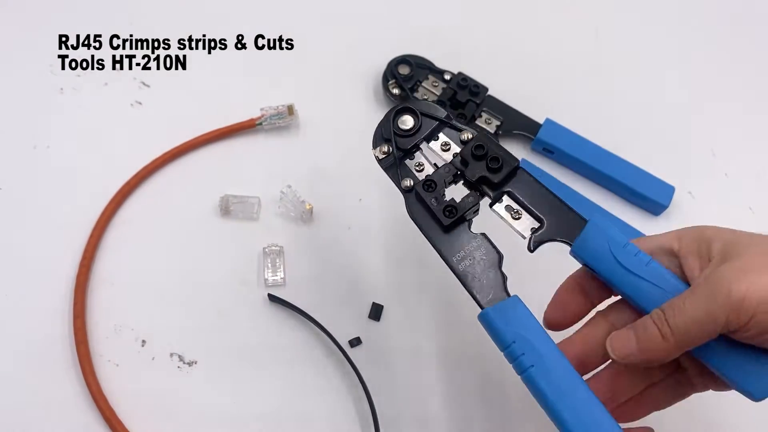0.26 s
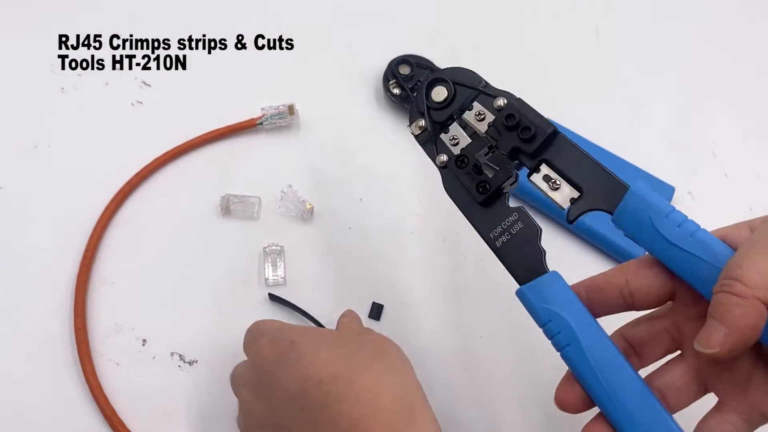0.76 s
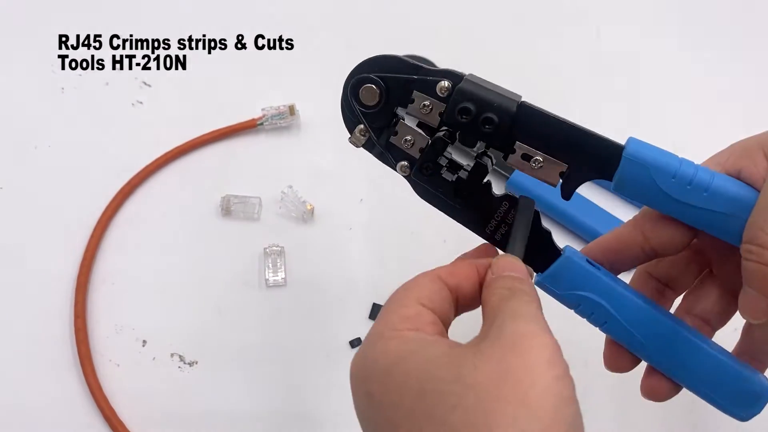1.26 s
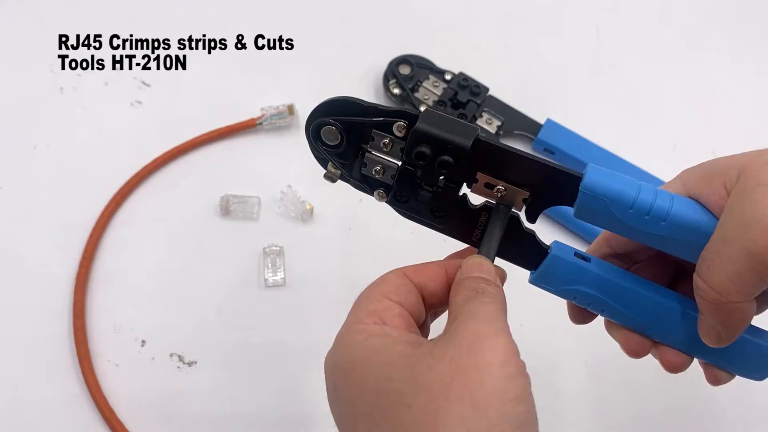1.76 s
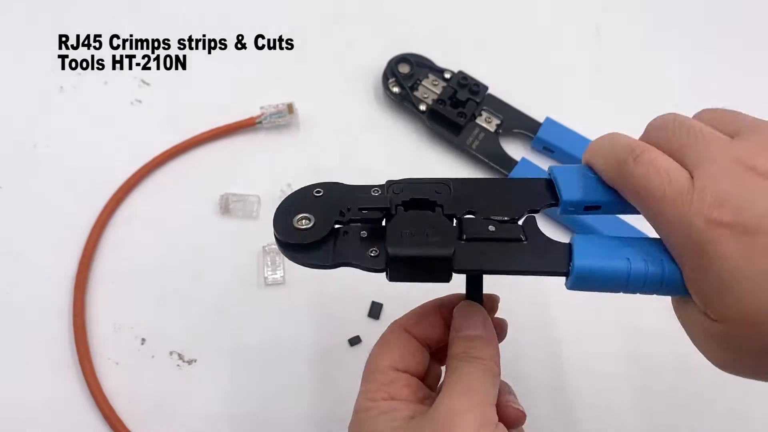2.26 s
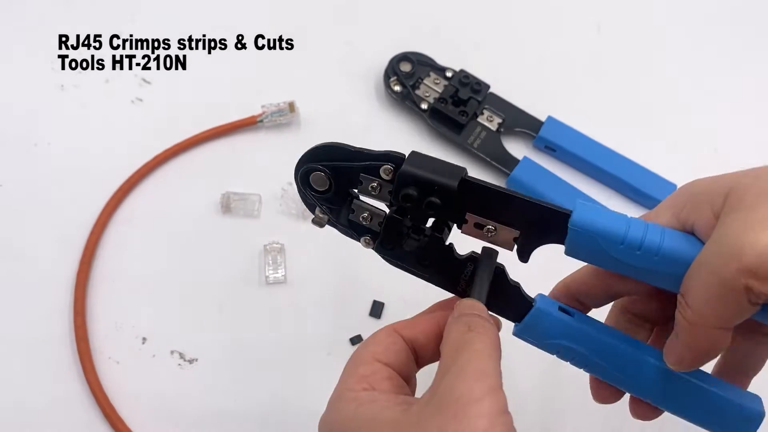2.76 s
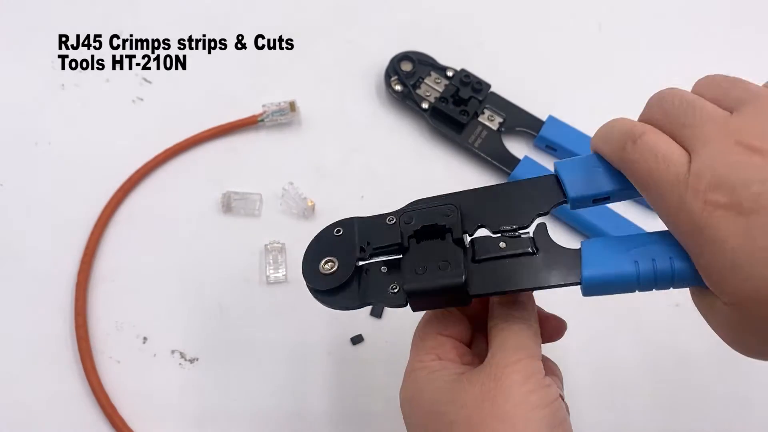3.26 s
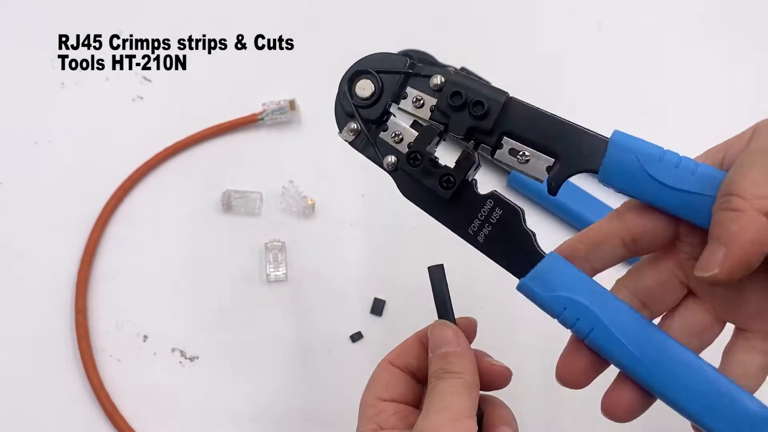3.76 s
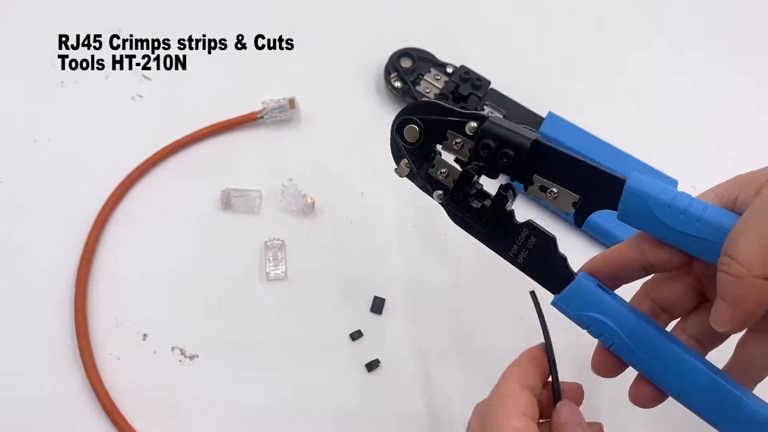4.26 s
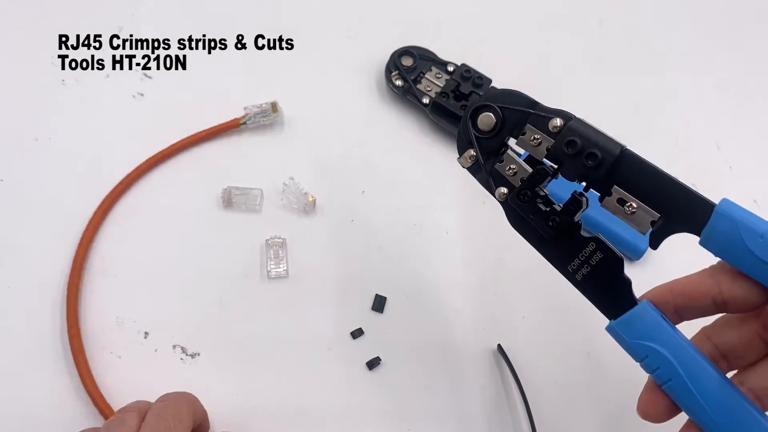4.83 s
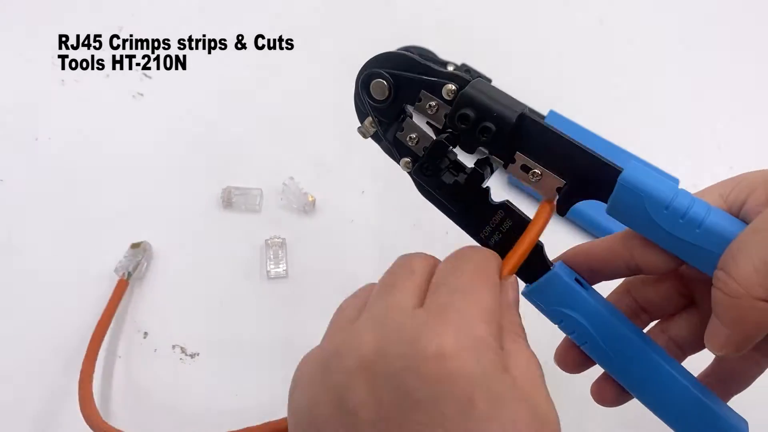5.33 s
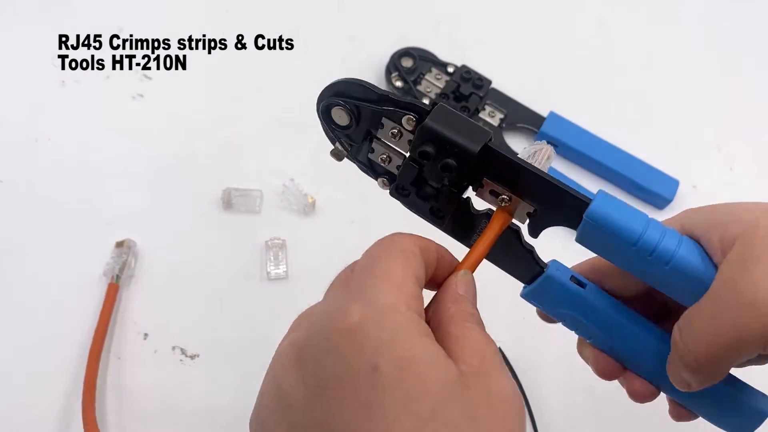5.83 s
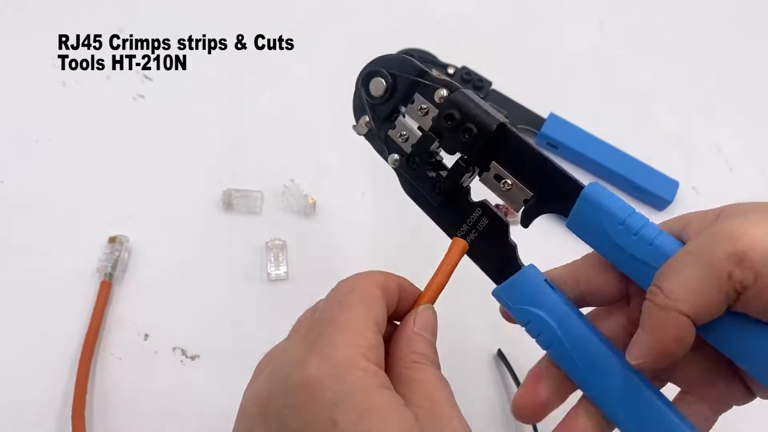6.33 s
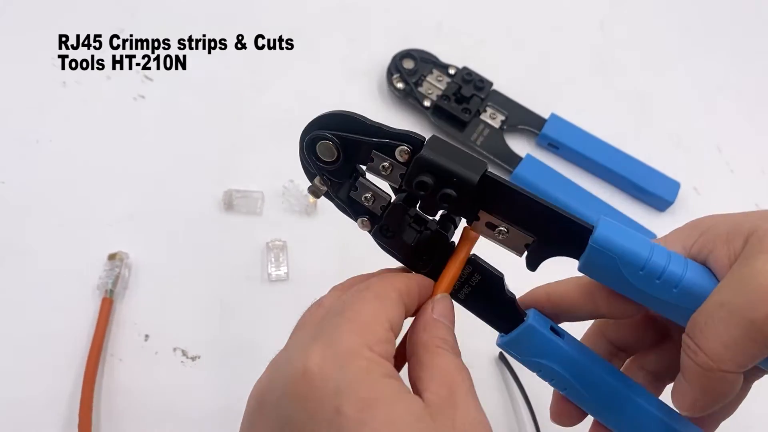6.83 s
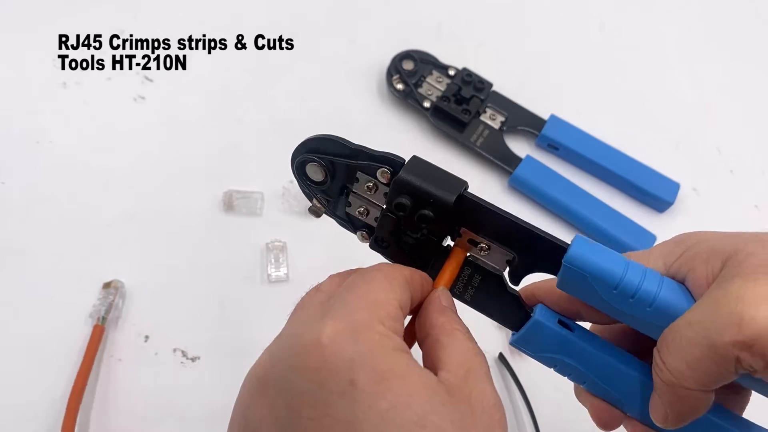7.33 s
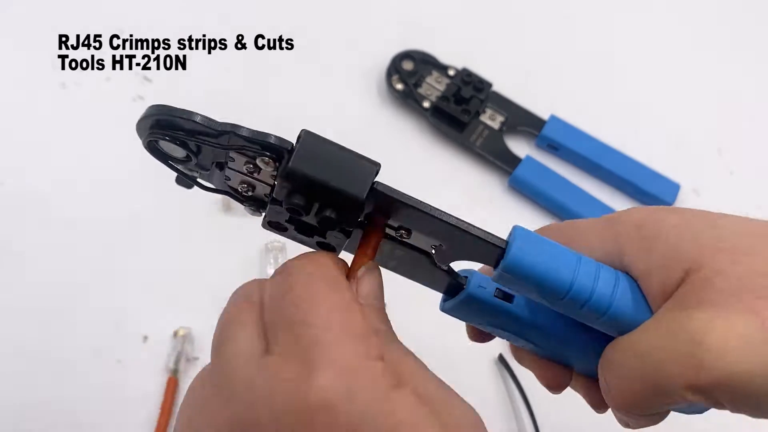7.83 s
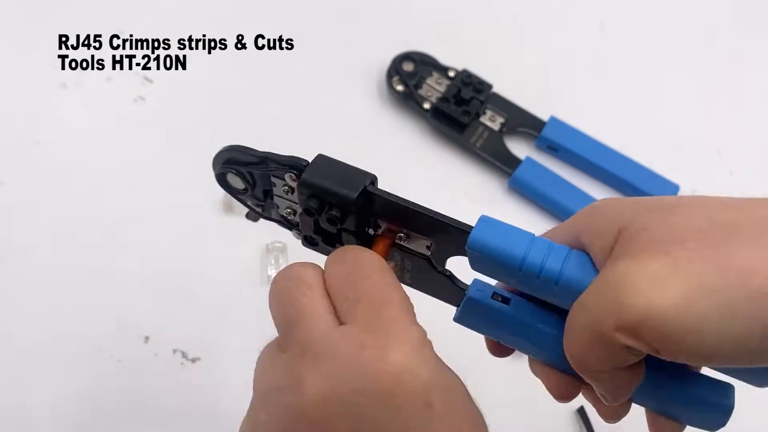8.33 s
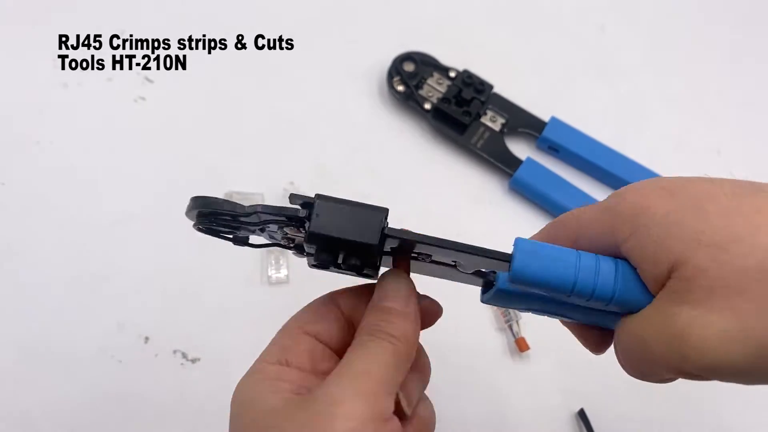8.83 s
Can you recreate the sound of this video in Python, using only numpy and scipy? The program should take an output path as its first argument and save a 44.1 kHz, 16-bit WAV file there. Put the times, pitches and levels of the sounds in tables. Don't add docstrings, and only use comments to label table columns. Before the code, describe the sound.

A small microphone sits a hand's breadth from a metal cable tool. Short gritty scrapes, tiny steel ticks and crisp bright snaps alternate with quiet gaps, some scrapes squeaking on a narrow pitch. The loudest moments are two thin cuts, the snap cutting off a plug and long scrapes as the cable is dragged and stripped. Dull knocks echo across the room early on, and air hiss with a low duct hum continues throughout.

```python
import sys
import numpy as np
from scipy import signal
from scipy.fft import rfft, irfft, next_fast_len
from scipy.io import wavfile
from scipy.ndimage import uniform_filter1d, map_coordinates

SR = 44100
rng = np.random.default_rng(int(sys.argv[2]) if len(sys.argv) > 2 else 0)


def volts(x):
    e = np.asarray(x, float) / 20
    return 10 ** e


def to_wav(s):
    ch = np.atleast_2d(s).T
    pcm = np.round(np.clip(ch, -1, 1) * 32767)
    wavfile.write(sys.argv[1], SR, pcm.astype(np.int16))


N = 400869

# start [s], peak level [dB], ring [Hz], t60 [s].
TABLE_BUMPS = [
    (1.06, -36.5, 223, 0.13),
    (4.479, -34.5, 232, 0.11),
    (4.527, -34, 240, 0.062),
    (4.835, -30.5, 239, 0.15),
    (6.467, -32.5, 255, 0.11),
    (8.326, -36, 247, 0.14),
    (8.445, -40, 209, 0.05),
    (9.059, -34.5, 231, 0.063),
]
# start [s], peak level [dB], treble [dB], build-up of echoes [s], ring [Hz].
FAR_KNOCKS = [
    (0.28, -51, -28, 0.01, 454),
    (0.321, -46, -8.5, 0.015, 476),
    (0.492, -35, -13, 0.014, 471),
    (3.281, -50, -36, 0.013, 509),
    (3.371, -33, -18.5, 0.014, 506),
    (3.566, -45, -9, 0.016, 500),
]
# centre [Hz], width [Hz], level [dB].
TOOL_LOW = [(3970, 590, 0.5), (4850, 870, 4.5), (5500, 400, -1.5), (6073, 1000, -2.5)]
# centre [Hz], width [Hz], level [dB].
TOOL_MIDDLE = [(5857, 1600, -8), (7540, 720, -3.5), (7980, 370, 0), (8570, 1200, -5.5)]
# centre [Hz], width [Hz], level [dB].
TOOL_TOP = [(9970, 1400, -4.5), (10990, 1000, -2.5), (12450, 1500, -5), (14140, 1300, -4.5),
            (15300, 1200, -11)]
# centre [Hz], width [Hz], level [dB].
GRIPS = [(446, 220, -8.5), (940, 310, -1.5), (1753, 500, -13)]
# centre [Hz], width [Hz], level [dB].
JACKET = [(1790, 1500, -4.5), (2290, 1200, 0), (3280, 1100, -3)]
# centre [Hz], width [Hz], level [dB].
WOOD_BODY = [(454, 197, -1.5), (780, 390, -1), (1086, 380, -1.5), (1960, 1040, -11.5)]
# frequency [Hz], level [dB per Hz].
KNOCK_TREBLE = [(300, -42), (1000, -15), (2200, 9.5), (3500, 8.5), (5000, 1), (9000, -21), (15000, -16)]
# frequency [Hz], level [dB per Hz].
VENT_AIR = [(60, -53), (130, -9), (224, -9), (258, -5.5), (328, -19.5), (565, -15), (613, -22),
            (1000, -22.5), (1120, -27), (2400, -32.5), (2750, -41.5), (5000, -47.5), (8000, -61.5),
            (16000, -52.5)]
# frequency [Hz], level [dB per Hz].
DUCT_RUMBLE = [(20, -45), (50, -28.5), (70, -16.5), (88, -2), (98, 7), (110, -6), (135, -5.5), (170, -58.5)]
# frequency [Hz], level [dB rms].
MAINS_TONE = [(199.2, -57)]
# frequency [Hz], left-right likeness [0 to 1].
PORT_LIKENESS = [(30, 0.94), (80, 1), (300, 0.93), (700, 0.53), (1500, 0.04), (2800, .15), (4500, 0.28),
                 (8000, 0.4), (15000, 0.25)]
# frequency [Hz], lead of the right port [radians].
PORT_LEAD = [(200, 0), (450, -0.23), (700, 0.41), (1000, 1.8), (1400, 2.5), (2000, 1), (2800, 3), (4000, 6),
             (5000, 6.5), (6500, 7), (8000, 6.5), (10000, 7.5), (12500, 6.5), (14500, 5.5)]
# frequency [Hz], t60 [s].
ROOM_T60 = [(200, 0.0965), (2000, 0.31), (8000, 0.15), (15000, 0.11)]

# centre [s], level [dB rms], half length [s], brightness [dB].
PICK_UP = [(.252, -78, .017, 7), (.83, -71, 0.075, -11), (.864, -53, 0.008, -1.5), (.925, -53, 0.017, -4),
           (.995, -49.5, 0.01, 7), (1.021, -47.5, 0.011, 3.5), (.96, -75, .02, 13), (1.045, -64, .015, 2),
           (1.085, -71, 0.017, 0), (1.118, -45.5, .011, 0.5), (1.135, -47, 0.012, 3),
           (1.155, -62, 0.0073, 3.5), (1.204, -39.5, 0.025, 0), (1.253, -39.5, 0.017, 2.5),
           (1.274, -51, 0.0093, 0.5)]
# centre [s], level [dB rms], half length [s], brightness [dB].
CUT_THIN = [(1.81, -78, 0.013, 3), (1.895, -70.5, 0.0093, 5), (1.96, -78, .012, 10),
            (2.045, -63, 0.0086, 3), (2.15, -62.5, 0.049, 3), (2.27, -79, 0.024, -10),
            (2.233, -55.5, 0.014, 0), (2.483, -63.5, 0.013, 7.5), (2.529, -65.5, 0.024, 2),
            (2.636, -53, 0.014, -6.5), (2.74, -66.5, 0.015, -3), (2.955, -79, 0.031, -11),
            (3.15, -51, 0.027, -1.5), (3.223, -57, 0.029, -4), (3.307, -69, 0.033, -1.5),
            (3.738, -59.5, .018, 6.5), (3.782, -69.5, 0.032, -1), (3.921, -67, 0.027, -20.5),
            (4.057, -69.5, 0.012, -1), (4.087, -73, 0.021, -1), (4.247, -68, 0.028, -17),
            (4.32, -55.5, 0.041, -1), (4.415, -57, 0.026, 2.5), (4.46, -63, .02, 7),
            (4.533, -48, 0.004, -1)]
# centre [s], level [dB rms], half length [s], brightness [dB].
DRAG = [(4.841, -50, 0.005, 2), (4.876, -42.5, 0.014, 3.5), (4.932, -48, 0.019, -5), (4.96, -34, 0.019, 0),
        (4.984, -39, 0.022, 4), (5.043, -35.5, 0.018, 2), (5.08, -35, 0.029, 6), (5.128, -43, 0.015, -1),
        (5.25, -67, 0.031, 0), (5.163, -35, 0.028, 0.5), (5.23, -61, 0.043, -25), (5.286, -62, 0.012, -17),
        (5.336, -55, 0.011, -16), (5.363, -58, 0.031, -12), (5.4, -58.5, 0.066, 1),
        (5.437, -57, 0.036, -21)]
# centre [s], level [dB rms], half length [s], brightness [dB].
FIT = [(5.526, -70.5, 0.025, -2), (5.576, -79, 0.015, -25), (5.64, -64.5, 0.032, -2.5),
       (5.732, -65.5, 0.026, -0.5), (5.802, -59, 0.023, -3), (5.865, -77, 0.083, -1),
       (5.936, -64.5, 0.02, -4), (5.977, -59, 0.0076, -1.5), (6.04, -68.5, 0.055, -3),
       (6.137, -69.5, 0.025, -9.5), (6.176, -72, 0.014, -4), (6.41, -65, 0.019, 4),
       (6.441, -67, 0.0078, -13), (6.505, -44, 0.02, 0), (6.539, -50, 0.0063, -1), (6.587, -73, 0.012, 4.5),
       (6.66, -83, 0.065, 5), (6.751, -69, 0.0092, -1.5), (6.887, -71.5, .017, -5.5),
       (6.947, -64.5, 0.017, -11), (7.209, -79.5, 0.0058, -12)]
# centre [s], level [dB rms], half length [s], brightness [dB].
CUT_THICK = [(7.462, -66, 0.0055, -12), (7.5, -71.5, 0.032, -2), (7.549, -57.5, 0.0092, -1.5),
             (7.615, -52, 0.0069, -13), (7.634, -38, 0.023, 0), (7.685, -46.5, 0.028, -5),
             (7.747, -49, 0.021, -10), (7.795, -59.5, 0.055, -10), (7.845, -50, 0.017, -3),
             (7.885, -77, .03, 6), (7.9, -58.5, 0.0066, -4), (7.945, -52.5, 0.02, -4),
             (7.978, -37, 0.028, 0.8), (8.018, -36, 0.013, 3.5), (8.06, -42, 0.03, 4.5),
             (8.105, -39, 0.043, -4), (8.145, -52, 0.018, -3), (8.238, -63, 0.013, 3),
             (8.291, -39, 0.012, 1.5), (8.48, -52, 0.016, 2), (8.501, -48, 0.011, -0.5),
             (8.671, -74, 0.022, -4.5), (8.772, -69.5, 0.0088, 10), (8.81, -65.5, 0.014, 15),
             (8.887, -54.5, 0.0021, -7), (8.908, -56.5, 0.0038, 4.5), (8.84, -71.5, 0.0063, -6),
             (8.963, -74, 0.0092, 7), (9.078, -56, 0.0087, 0.5)]
# strokes, outer resonances over the middle [dB], jacket share [dB].
ACTIONS = [(PICK_UP, 0.7, -6), (CUT_THIN, 1.3, -9.5), (DRAG, -1, -14.5), (FIT, 0.1, -6),
           (CUT_THICK, 0.69, -9)]

# start [s], peak level [dB], low resonances [dB], grip knock [dB].
CUTS = [
    (2.0805, -2.5, -11.5, -28),
    (2.0824, -8, -7, -34),
    (2.0847, -15, -10, -39.5),
    (2.0887, -22, -13, -41),
    (3.5045, -8, -14.5, -20.5),
    (6.2126, -6, -9.5, -32),
    (6.2146, -19, -5.5, -27.5),
    (8.51, -30.5, -8.5, -25),
]
# start [s], peak level [dB], low resonances [dB], grip knock [dB].
STOPS = [
    (3.8365, -21, 9.5, -18),
    (3.866, -33, 7.5, -29),
    (3.8765, -44, 10, -30),
    (3.8946, -26.5, 2.5, -27),
    (3.9538, -44, 12, -24),
    (4.5048, -26.5, 10, -14.5),
    (5.906, -36, -3.5, -18),
    (6.4645, -16.5, 7, -27),
    (8.3234, -24, 4, -29),
]
# start [s], peak level [dB], low resonances [dB], grip knock [dB].
RATTLES = [
    (9.0597, -18.5, -3, -24),
]
# start [s], peak level [dB], low resonances [dB], grip knock [dB].
TAPS = [
    (.992, -43.5, 8, -6),
    (1.0598, -31, -2, -15),
    (1.113, -38, -22, -9),
    (1.1535, -34.5, 3, -8.5),
    (4.8318, -30.5, -8, -10),
]
# start [s], peak level [dB], low resonances [dB], grip knock [dB].
TICKS = [(.2504, -60, -13, -21), (.8479, -44, 8, -22), (.9127, -48, -7, -42), (1.884, -57, -11, -28),
         (1.955, -65, -20, -28.5), (2.037, -55, -5.5, -30), (2.474, -49, -4, -28), (2.487, -52, -8, -28),
         (2.458, -54, -20, -28), (3.7224, -46, -11.5, -26.5), (4.364, -54, -5, -28), (4.497, -43.5, 5, -18),
         (4.527, -29.5, -3, -22), (5.894, -52, -5, -28), (5.3352, -32, -13.5, -19), (5.6146, -61, -3, -24),
         (5.7823, -45, -29, -26), (5.9384, -43, -12, -33), (6.3936, -46, 3.5, -29), (6.584, -48, 0.5, -26),
         (7.4573, -50, -4.5, -22), (7.6425, -18, -9, -39), (8.228, -48, -15, -30),
         (8.459, -37.5, -12, -28.5), (8.8834, -49, -13, -22), (.8567, -38, -6, -20), (3.358, -49, 4, -25),
         (3.741, -50, -14, -28), (3.773, -54, -4, -28), (4.457, -52, -20, -30), (4.4805, -32.5, 2, -20),
         (8.2775, -21, -9, -26), (8.675, -54, -25, -30)]
# start [s], peak level [dB], low resonances [dB], grip knock [dB].
CRACKS = [(.9615, -58, -20, -30), (1.1845, -38, 0, -30), (1.2488, -38.5, -1, -30), (4.866, -50, -8, -17.5),
          (4.8758, -40, -12, -23), (5.0225, -21.5, -8, -35), (5.0645, -20, -16, -42),
          (4.9462, -25, -12, -35), (5.1448, -31, 1, -37), (7.6248, -33, -8, -35), (1.1915, -30, -4, -30),
          (6.5367, -35, 2, -30), (6.3945, -45, -2, -30), (6.4968, -33, 3, -30), (6.4377, -47, -8, -12),
          (6.4884, -30, 4, -26), (7.9331, -35, -12, -35), (8.0445, -38, -14, -33), (8.055, -26, -14, -33),
          (8.0705, -34, -16, -33), (8.0153, -36, -14, -33), (7.739, -52, 15, -30)]
# contacts, top resonances [dB], t60 [s], first blow over the rattle [dB].
CONTACTS = [(CUTS, -8, .036, 7.4), (STOPS, -0.8, 0.044, 0.44), (RATTLES, -5, 0.11, -1.4),
            (TAPS, -2, 0.04, 2.6), (TICKS, -10, 0.0397, 0.96), (CRACKS, -1.2, .02, 2)]

# centre [s],
# level [dB rms], half length [s], pitch [Hz].
SINGING_STROKES = [(0.861, -59, 0.0092, 4640), (0.916, -56.5, .014, 4300), (0.944, -69, .005, 3300),
                   (.995, -51, 0.0045, 3300), (.996, -57, 0.0046, 1720), (.995, -55, 0.011, 11800),
                   (1.014, -52, .01, 6200), (1.012, -54, .012, 11450), (1.117, -52, .008, 7170),
                   (1.156, -41.5, 0.0039, 5540), (1.202, -38.5, 0.019, 6600), (1.208, -48, 0.024, 5040),
                   (1.21, -42, 0.013, 12800), (1.249, -38.5, 0.0097, 5500), (2.232, -58, 0.016, 5540),
                   (2.636, -51.5, 0.0087, 5900), (3.151, -49, 0.024, 5960), (3.232, -58, 0.021, 5100),
                   (4.245, -58, .018, 4800), (4.249, -58.5, 0.028, 2840), (4.408, -59.5, .025, 4950),
                   (4.473, -48.5, .004, 4970), (4.522, -55, .006, 4900),
                   (3.6, -61, 0.0087, 2500), (4.878, -56, 0.029, 3030), (4.878, -59, 0.023, 1450),
             (4.878, -44, 0.0086, 9700), (5.338, -56, 0.0056, 7400), (4.962, -34, 0.03, 6170),
             (4.96, -37, 0.023, 5000), (4.99, -45.5, 0.014, 4160), (5.045, -38, 0.018, 6800),
             (5.087, -32, 0.023, 7330), (5.082, -38.5, 0.02, 5550), (5.155, -40.5, 0.013, 7100),
             (5.15, -43, 0.01, 5560), (5.18, -41, 0.0098, 5800), (5.235, -61, .02, 5300),
             (7.1, -67, .006, 3400), (5.355, -53, 0.0077, 4900), (2.7, -71, 0.036, 3500),
             (5.44, -62, 0.023, 5500), (5.62, -62, 0.012, 4400), (5.2, -57, 0.015, 2770),
             (5.58, -78, .02, 3200), (7.1, -80, 0.0086, 3600), (4.1, -61, .01, 3500),
             (6.03, -64, 0.021, 7700), (5.6, -66.5, 0.02, 7000), (4.3, -64, .02, 2900),
             (4.69, -90, 0.04, 13300),
                   (6.472, -43, 0.0057, 5200), (6.505, -43, 0.017, 4800), (6.5, -53, 0.021, 3400),
              (6.5, -46, 0.011, 8500), (6.535, -49.5, 0.014, 4770), (7.613, -48, 0.013, 4060),
              (7.64, -41.5, 0.023, 4530), (7.63, -47, 0.017, 14100), (7.635, -41, 0.024, 7200),
              (7.69, -48.5, 0.014, 4850), (7.745, -47, 0.012, 4700), (7.8, -68, 0.04, 4300),
              (7.8, -65, .02, 7040), (7.848, -54, 0.016, 7300), (7.85, -63, 0.017, 4820),
              (7.945, -55, .018, 4670), (7.977, -39, 0.01, 4850), (7.98, -39, 0.012, 7300),
              (7.985, -42, .013, 9500), (8.02, -42, 0.0091, 11100), (8.02, -46, .01, 6550),
              (8.062, -50, .018, 8100), (8.107, -41, 0.029, 5150), (8.105, -51, 0.017, 7500),
              (8.145, -58, 0.012, 4960), (8.49, -66, .02, 7660)]

USUAL_DB = -51
JACKET_FADES, OUTER_FADES = 0.38, 0.095
DULL_IS_JACKET = 0.55
EDGE = 2.51


def unit(x):
    return x / np.sqrt(np.mean(x ** 2) + 1e-20)


def along(points, hz):
    f, v = np.transpose(points)
    return np.interp(np.log(hz + 1), np.log(f + 1), v)


def wobble(rate):
    knots = rng.standard_normal(int(N * rate / SR) + 4)
    return map_coordinates(knots, [np.arange(N) * rate / SR])


def filtered(x, response):
    m = next_fast_len(x.shape[-1] + SR // 4)
    spectrum = rfft(x, m) * response(np.fft.rfftfreq(m, 1 / SR))
    return irfft(spectrum, m)[..., :x.shape[-1]]


def modes(table):
    def raw(f):
        total = 0
        for k, (centre, width, db) in enumerate(table):
            loss = 1j * f * width
            total = total + (-1) ** k * volts(db) * loss / (centre * centre - f * f + loss)
        return total

    norm = np.sqrt(np.mean(abs(raw(np.arange(1, SR / 2, 10))) ** 2))
    return lambda f: raw(f) / norm


def spread(pair, gain):
    def mid_and_side(hz):
        turn = np.arccos(np.clip(along(PORT_LIKENESS, hz), -1, 1)) / 2
        return gain(hz) * [np.cos(turn), np.sin(turn)]

    mid, side = filtered(pair, mid_and_side)
    return np.array([mid + side, mid - side])


def patchy(x, patchy_db, turns, size):
    z = signal.stft(x, nperseg=256)[2]
    field = rng.standard_normal((3, *z.shape[-2:]))
    field = uniform_filter1d(field, size=3, axis=1)
    field = unit(uniform_filter1d(field, size=size, axis=2))
    patched = z * volts(patchy_db * field[2]) * np.exp(1j * turns * field[:2])
    return signal.istft(patched, nperseg=256)[1][..., :N]


def steel(force, damping):
    def small(f):
        return (1j * f / (1j * f + 3800 - 3800 ** 2 * .6j / (f + 1e-9))) ** 3

    def responses(f):
        groups = []
        for table in (TOOL_LOW, TOOL_MIDDLE, TOOL_TOP):
            damped = modes([(centre, damping * width, db) for centre, width, db in table])
            groups.append(small(f) * damped(f))
        return groups + [modes(JACKET)(f)]

    return filtered(force, responses).sum(axis=0)


def hum():
    t = np.arange(N) / SR
    duct = unit(spread(rng.standard_normal((2, N)), lambda hz: volts(along(DUCT_RUMBLE, hz))))
    duct_db = -53.5 - 0.5 * t + 1.6 * wobble(4.6)
    air = patchy(rng.standard_normal((2, N)), patchy_db=1.6, turns=0, size=20)
    air = unit(spread(air, lambda hz: volts(along(VENT_AIR, hz))))
    tone = np.zeros(N)
    for hz, db in MAINS_TONE:
        level = np.sqrt(2) * volts(db + 0.59 * wobble(3.19))
        tone += level * np.sin(2 * np.pi * hz * t + 0.25 * wobble(3.4))
    return volts(-55) * air + volts(duct_db) * duct + tone


def scrapes():
    power, t = np.zeros((4, N)), np.arange(N) / SR
    for strokes, outer_db, jacket_db in ACTIONS:
        for s, db, half, bright_db in strokes:
            near = slice(max(round((s - .2) * SR), 0), round((s + .2) * SR))
            harder_db = db - USUAL_DB
            outer = outer_db - OUTER_FADES * harder_db
            share = volts(2 * np.array([outer - bright_db, 0, outer + bright_db]))
            soft = volts(2 * (jacket_db - JACKET_FADES * harder_db - DULL_IS_JACKET * bright_db))
            swell = volts(2 * db - 17.3 * abs((t[near] - s) / half) ** EDGE)
            power[:, near] += np.outer([*share / share.sum(), soft], swell)
    grit = volts([2.6 * wobble(500) for group in power])
    sharp = rng.random(N) < 150 / SR
    sharp_small = rng.random(N) < 900 / SR
    grit *= 1 + 1.2 * sharp + 2.5 * sharp_small
    slips = unit(grit * rng.standard_normal((4, N)) * volts(3.8 * rng.standard_normal(N)))
    broad = volts(-0.88) * steel(np.sqrt(power) * slips, damping=1.2)
    return patchy(broad + singing(), patchy_db=1.8, turns=.65, size=6)


def snaps():
    force, grips = np.zeros((4, N + SR)), np.zeros(N + SR)
    first = 400
    t = np.arange(-first, SR // 4) / SR
    for rows, top_db, t60, first_db in CONTACTS:
        lead_in = volts(-24 + 1400 * t)
        dying = volts(-60 * t / max(t60, .005)) + 1.2 * volts(-60 * t / 0.0063)
        shape = np.where(t < 0, lead_in, dying)
        for s, db, low_db, knock_db in rows:
            uneven = volts(4 * rng.standard_normal(len(t)) - 12)
            rattle = shape * rng.standard_normal((5, len(t))) * uneven
            rattle[:, first] = volts(first_db) * np.array([6, 6.5, 3.2, 3.5, 5])
            start = round(s * SR) - 350
            at = slice(start, start + len(t))
            group_db = np.array([[low_db], [-4], [top_db], [1.5 * low_db - 11.5]])
            force[:, at] += volts(db + group_db - 10.5) * rattle[:4]
            grips[at] += volts(db + knock_db - 2.5) * rattle[4]
    late_s = 0.0016
    knock = filtered(grips[:N], lambda f: modes(GRIPS)(f) * np.exp(-2j * np.pi * f * late_s))
    return steel(force[:, :N], damping=1.3) + knock


def knocks():
    body, treble = np.zeros((2, 2, N + SR))
    ring, t = np.zeros(N + SR), np.arange(SR // 2) / SR
    for s, db, treble_db, build, hz in FAR_KNOCKS:
        u = t / max(build, .002)
        start = round((s - .002) * SR)
        at = slice(start, start + len(t))
        arrival = np.sqrt(u) * (np.exp(.5 - u) + 0.41 * np.exp(-u / 2.4))
        crowd = arrival * rng.standard_normal((2, 2, len(t)))
        body[:, at] += volts(db - 3) * crowd[0]
        treble[:, at] += volts(db + treble_db - 9.5) * crowd[1]
        ring_db = db + 4 - 0.15 * (hz - 470)
        swell = u ** 2 * (np.exp(1 - u ** 2) + 0.14 * np.exp(-1.7 * u))
        ring[at] += volts(ring_db) * swell * np.sin(2 * np.pi * hz * t)
        overtone = np.sin(2 * np.pi * 2.15 * hz * t + 1.6 * wobble(40)[:len(t)])
        ring[at] += volts(db - 6.5) * u * np.exp(1 - u) * overtone
    body = spread(body[:, :N], modes(WOOD_BODY))
    treble = spread(treble[:, :N], lambda f: volts(along(KNOCK_TREBLE, f) + 9.0))
    return body + treble, ring[:N]


def singing():
    out, width_hz, rise = np.zeros(N), 940, 0.94
    t = np.arange(-SR // 12, SR // 12) / SR
    for s, db, half, hz in SINGING_STROKES:
        pole = np.exp((2j * hz - width_hz) * np.pi / SR)
        slips = rng.standard_normal(len(t)) * volts(4 * rng.standard_normal(len(t)))
        ring = signal.lfilter([1], np.poly([pole, pole]), slips).real
        side = np.where(t < 0, rise * half, half)
        swell = volts(db - 8.1 * abs(t / side) ** EDGE)
        out[round((s + t[0]) * SR):][:len(t)] += swell * unit(ring)
    return out


def bumps():
    out, slap = np.zeros((2, N + SR))
    t = np.arange(SR // 4) / SR
    for s, db, hz, t60 in TABLE_BUMPS:
        ring = np.sin(2 * np.pi * hz * t) + .5 * np.sin(2 * np.pi * .65 * hz * t)
        onset = 1 - np.exp(-t / 0.0012)
        out[round(s * SR):][:len(t)] += volts(db - 3.5 - 60 * t / t60) * onset * ring
        dull = volts(db - 16.0 - 60 * t / 0.15) * rng.standard_normal(len(t))
        slap[round(s * SR) - 60:][:len(t)] += dull
    low_ring = filtered(out[:N], lambda f: (1j * f / (1j * f + 90)) ** 2)
    return low_ring + filtered(slap[:N], modes(WOOD_BODY))


def room(x, early_db):
    hz, t, z = signal.stft(rng.standard_normal((2, SR // 2)), SR, nperseg=256)
    dying = volts(-60 * t / along(ROOM_T60, hz)[:, None])
    tail = signal.istft(z * dying, SR, nperseg=256)[1]
    early = rng.standard_normal(tail.shape) * volts(-60 * np.arange(tail.shape[1]) / SR / 0.023)
    both = tail / np.linalg.norm(tail[0]) + volts(early_db) * early / np.linalg.norm(early[0])
    delayed = np.pad(np.atleast_2d(x), ((0, 0), (60, 0)))
    return signal.fftconvolve(delayed, spread(both, np.ones_like), axes=1)[:, :N]


def scene():
    rubs, blows, (far, ring) = scrapes(), snaps(), knocks()
    tool = rubs * volts([[-2], [0]]) + blows * volts([[-5], [1]])
    near = tool + volts(-14.5) * room(rubs + blows, early_db=8.5) + bumps()
    return near + ring + volts(1.0) * far + volts(-6) * room(far, early_db=2.5) + hum()


def gated(x, gate_db, top_gate_db):
    gate_hz, top_hz, limit_hz = 12000, 15800, 16800
    hz, _, z = signal.stft(x, SR, nperseg=1024)
    level = uniform_filter1d(abs(z) ** 2, size=16, axis=1).mean(axis=0)
    threshold = volts(2 * np.where(hz > top_hz, top_gate_db, gate_db))
    keep = (level > threshold[:, None]) | (hz < gate_hz)[:, None]
    gain = (hz < limit_hz) * volts(-12 * (hz > top_hz))
    return signal.istft(z * keep * gain[:, None], SR, nperseg=1024)[1][:, :N]


def top_cut(x):
    return signal.sosfilt(signal.butter(12, 16840, fs=SR, output="sos"), x)


def record(dry):
    half_lead = np.array([[-1], [1]]) / 2
    ports = filtered(dry, lambda hz: np.exp(1j * along(PORT_LEAD, hz) * half_lead))
    mix = gated(ports, gate_db=-104.5, top_gate_db=-68)
    return top_cut(mix)


dry = scene()
out = record(dry)
to_wav(out)
```